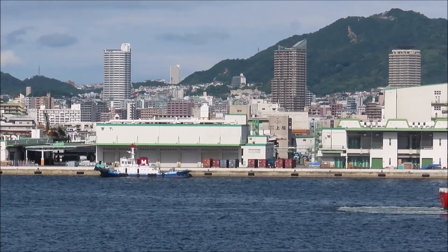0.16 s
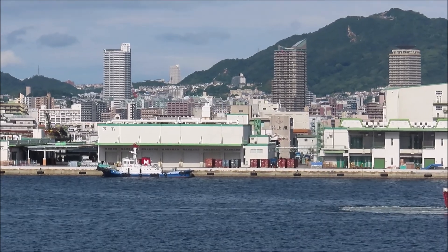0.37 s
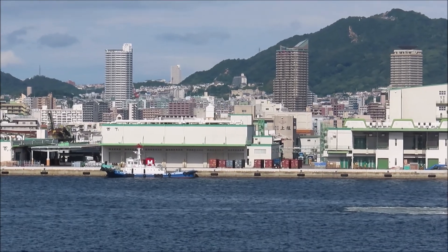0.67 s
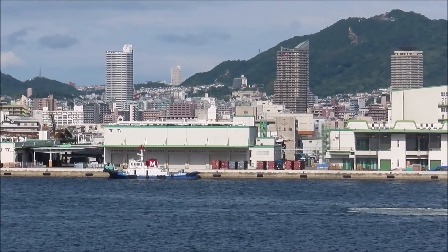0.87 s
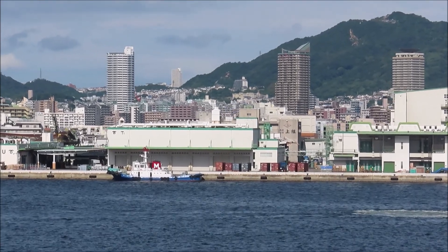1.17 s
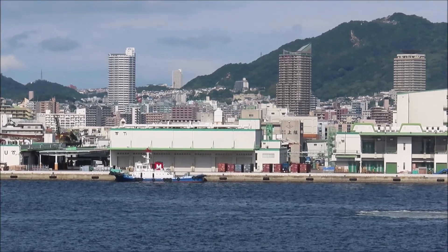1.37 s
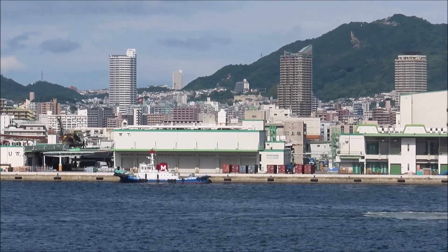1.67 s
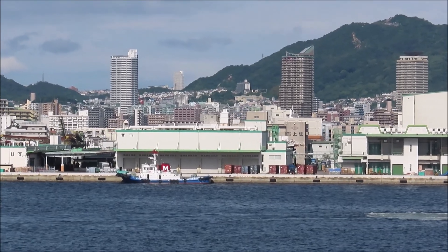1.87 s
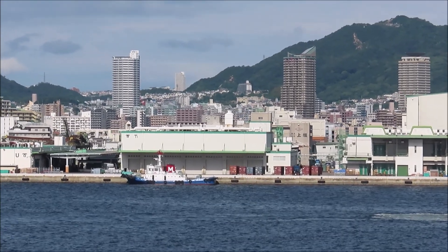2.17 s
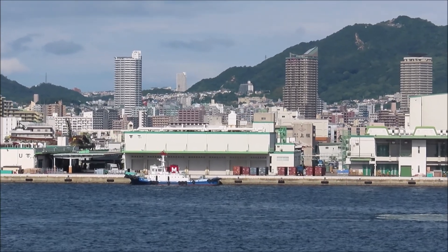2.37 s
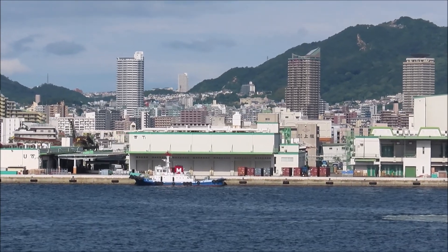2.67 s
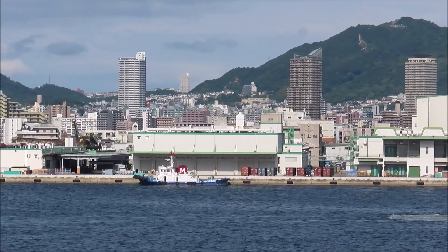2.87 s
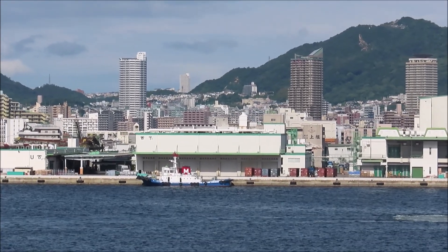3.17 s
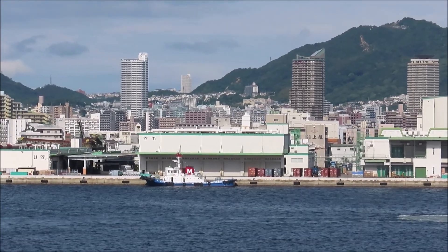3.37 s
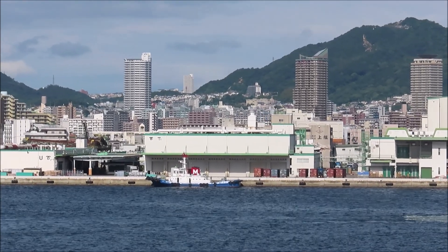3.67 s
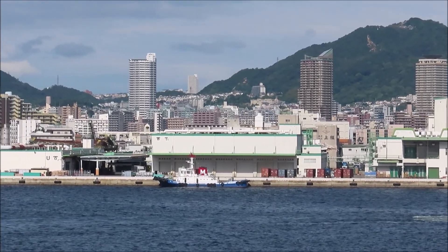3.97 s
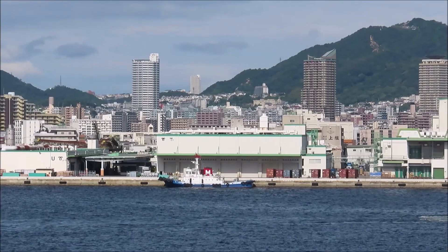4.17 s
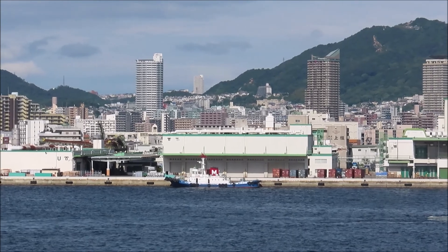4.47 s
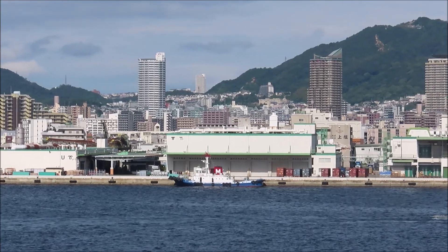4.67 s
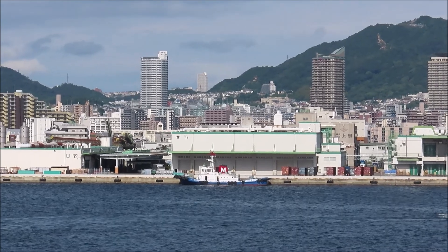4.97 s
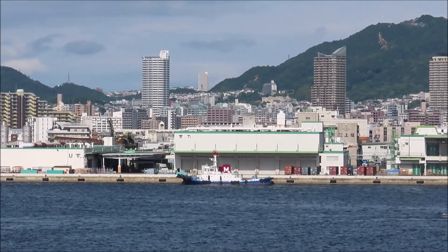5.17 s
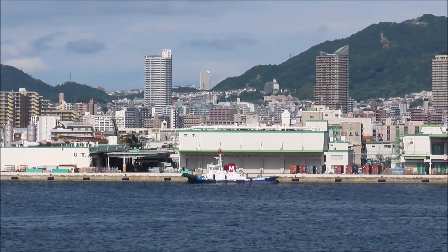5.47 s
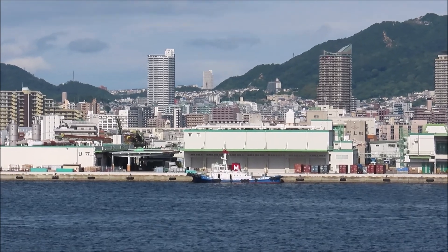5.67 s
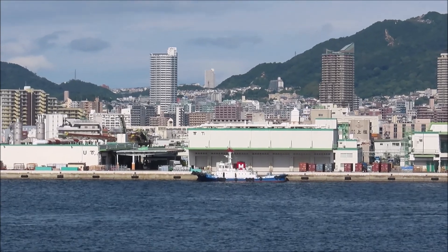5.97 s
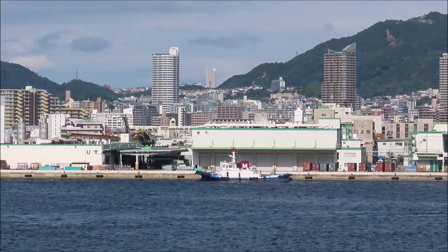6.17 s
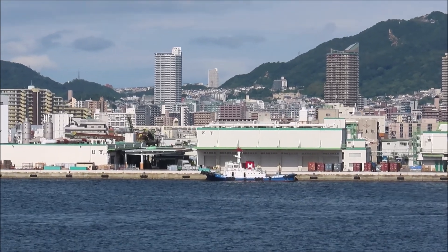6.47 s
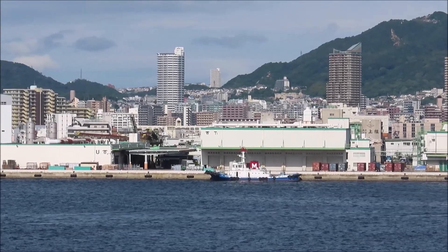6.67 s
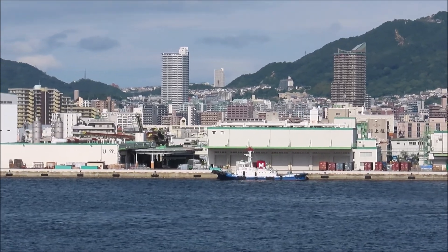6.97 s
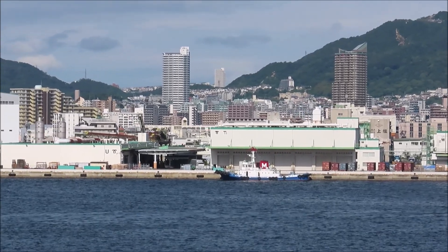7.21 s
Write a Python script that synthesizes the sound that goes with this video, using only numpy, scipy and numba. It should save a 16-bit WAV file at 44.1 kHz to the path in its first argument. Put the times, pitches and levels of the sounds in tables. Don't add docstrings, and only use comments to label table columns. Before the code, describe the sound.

Continuous deep engine drone and hull vibration, lumpy and restless, heard close from a boat deck outdoors. Soft wash and light spray hiss sit well beneath it, the spray spread wide. The bass grows fuller after about two seconds; blunt wind bumps strike the stereo microphone from 4.5 to 5.5 seconds, after which the low end is reduced.

```python
import sys
import numpy as np
from scipy import signal
from scipy.io import wavfile
from scipy.ndimage import uniform_filter1d
from numba import njit

SR = 44100
rng = np.random.default_rng(int(sys.argv[2]) if len(sys.argv) > 2 else 0)


def persist_wave(psi):
    counts = np.round(np.clip(psi, -1, 1) * 32767).astype(np.int16)
    wavfile.write(sys.argv[1], SR, np.atleast_2d(counts).T)


def natural_amplitude(level_db):
    exponent = np.asarray(level_db, float) / 20
    return 10 ** exponent


N = 323694

PORT_FIRING_HZ, STARBOARD_FIRING_HZ = 43.93, 45.045
CANCEL_S = .79
# multiple of firing rate, port level/dB rms, starboard level/dB rms, unsteadiness/dB,
# starboard lead at CANCEL_S/rad
ENGINE_ORDERS = [
    (1, -20, -20, .4, 3.1),
    (2, -26, -26.5, 1.5, -2.6),
    (3, -34, -35, 2.5, 3.1),
    (6, -39, -47, 4, -2.4),
    (12, -53, -53, 4, 0),
]
# f/Hz, level/dB rms, unsteadiness/dB
AUXILIARIES = [(26.5, -34.5, 1.5), (60.4, -31, 2.5), (78.4, -23.5, -0.5), (90.7, -29, 2.5), (121.3, -31, 4),
               (161.6, -31.5, 4)]
# f/Hz, width/Hz, level/dB rms
HULL_MODES = [(36.2, 36, -29.5), (79.4, 16, -28), (88.3, 20, -26.5), (121.8, 20.6, -19.5),
              (135.1, 16.4, -25.5), (163.6, 10, -33.5), (220.7, 39.5, -33), (261.5, 22.4, -32),
              (359.2, 40, -36.5), (525, 36, -40.5)]
SWELL_BELOW_HZ = 190
# t/s, rise/dB, length/s
SURGES = [(0.122, 11, 0.049), (0.399, 6.5, 0.37), (0.94, 9, 0.19), (1.185, 1.5, 0.077), (1.435, 7.5, 0.16),
          (1.963, 12.5, 0.11), (2.393, 4, 0.26), (2.796, 12.5, 0.31), (3.28, 2.5, 0.042),
          (3.599, 14, 0.084), (3.79, 3, 0.042), (4.017, 6, 0.11), (4.278, 12, 0.18), (4.512, 10, 0.055),
          (4.896, 16, 0.13), (5.83, 9, .05), (6.198, 6, 0.12), (6.784, 5, 0.12), (7.313, 8.5, 0.063)]
# t/s, fall/dB
LULLS = [
    (.01, 7.5),
    (2.12, 1),
    (5.09, 15),
    (5.45, -2),
    (5.72, 0),
    (6.56, 4),
    (7.1, -3),
]
LULL_S, CALM_DB = 0.21, -5.5
PANEL_EDGES_HZ = [72, 104, 150, 235, 330, 480, 700, 1100]
FLEX_S, STIFFNESS = .045, .9
# t/s, rise/dB
KEEL_FLEX = [(0.05, 0), (0.21, -8), (0.36, -7.5), (0.59, 3.5), (0.66, -5.5), (0.77, -5), (0.85, 4),
             (1.12, -10), (1.26, -7), (1.35, 4.5), (1.44, 0.5), (1.6, -3.5), (1.69, -18), (1.8, 3),
             (1.96, 2.5), (2.08, -8), (2.2, -6), (2.27, 3.5), (2.37, 6), (2.47, -4.5), (2.57, -1.5),
             (2.63, 0.5), (2.69, -7), (2.75, 1.5), (2.89, -6.5), (3.21, -1), (3.32, 5), (3.4, -6),
             (3.59, 1.5), (3.68, 0), (3.74, -7), (3.87, -1), (3.94, -5.5), (4.07, 3), (4.17, -7.5),
             (4.25, 1.5), (4.32, -12), (4.48, 6.5), (4.68, -4), (4.98, 2.5), (5.13, -12), (5.28, -10),
             (5.41, -1), (5.53, -2), (5.59, -1), (5.69, -6.5), (5.88, 1), (5.95, -6.5), (6.01, 4),
             (6.15, -6), (6.22, -8), (6.32, 5.5), (6.51, -1), (6.65, -1), (6.8, 3), (6.95, -2), (7.04, -11),
             (7.29, 3.5)]
# t/s, rise/dB
SIDE_FLEX = [(0.02, -7.5), (0.2, -1), (0.27, -0.5), (0.35, 8.5), (0.63, -2.5), (0.72, -4.5), (0.82, -9),
             (0.91, 0), (1.12, -4.5), (1.2, -1.5), (1.44, 6), (1.52, -6.5), (1.72, 0.5), (1.84, -10.5),
             (1.9, 4.0), (1.98, -1), (2.2, -1), (2.39, -4.5), (2.51, 4), (2.57, -7), (2.63, 5.5), (2.7, -5),
             (2.78, 4), (2.86, -3.0), (3.2, -5.5), (3.33, -3), (3.45, 2.0), (3.82, 3), (3.88, -4),
             (3.94, -4.5), (4.14, -5.5), (4.24, 4.0), (4.35, 2.0), (4.44, -3.5), (4.52, 0.5), (4.58, 0),
             (4.67, -3), (4.84, 0), (5.05, -8.0), (5.11, -3.5), (5.2, -4.5), (5.26, 7.5), (5.62, -12),
             (5.77, 4.5), (5.83, -8), (5.9, -6), (6.0, -2), (6.13, 5.0), (6.22, 5), (6.36, -4), (6.42, -1),
             (6.57, -7), (6.68, -1), (6.75, 5), (6.88, 4), (7.02, -5), (7.2, -6.5), (7.32, -3)]
# t/s, rise/dB
DECK_FLEX = [(0.0, 2), (0.07, -1), (0.16, 0), (0.34, 4.5), (0.45, 3.5), (0.53, -2), (0.61, -5.5), (0.8, 1),
             (0.87, -3), (0.97, -7), (1.2, -3.5), (1.29, 2), (1.53, 2), (1.59, -3.5), (1.68, -2), (1.79, 3),
             (1.85, -4), (1.97, 1), (2.27, 1), (2.46, 4.5), (2.57, -6), (2.63, 6.5), (2.7, -5.5),
             (3.11, -2.5), (3.25, -7), (3.5, 0), (3.58, 0.5), (3.66, 1), (3.91, -2), (3.98, 6),
             (4.12, -1.5), (4.21, -7.5), (4.33, -3.5), (4.43, -5), (4.49, 5.5), (4.61, -10), (4.75, 3.0),
             (4.86, -0.5), (5.11, -1), (5.19, -5), (5.25, 1), (5.32, 2), (5.41, 0), (5.48, -7),
             (5.74, -8.0), (5.91, 0.5), (5.99, 4.5), (6.06, -6), (6.17, -4), (6.25, -3.5), (6.49, -5),
             (6.57, 1), (6.67, -2.0), (6.73, -12), (6.91, 2), (7.08, -2), (7.2, -3), (7.3, 2)]
# t/s, rise/dB
RAIL_FLEX = [(0.03, -2.5), (0.13, -2.0), (0.19, 5), (0.47, -4), (0.54, 7), (0.61, -2.5), (0.73, -0.5),
             (0.79, 0), (0.92, 2), (1.06, -2), (1.22, -5.0), (1.44, 4.5), (1.51, -4.0), (1.6, 3),
             (1.79, -2), (1.87, 2.0), (1.99, -1), (2.05, 0.5), (2.15, -2), (2.42, 3.5), (2.5, -2.5),
             (2.68, -3.5), (2.74, 2.5), (3.18, 0), (3.4, 2), (3.55, -1.5), (3.73, -0.5), (3.86, -2.5),
             (3.94, 0.5), (4.05, 3), (4.16, 4.5), (4.22, -3.5), (4.49, -6), (4.7, -5), (4.84, -5),
             (4.91, -3.5), (4.98, 2), (5.05, -2), (5.18, 4), (5.24, -19), (5.3, 2), (5.39, -3), (5.46, 1),
             (5.52, 1), (5.75, -2), (5.92, 1.5), (6.11, -9.5), (6.21, -4.5), (6.37, 6.5), (6.52, -4),
             (6.72, -3), (6.84, -3.5), (6.9, 0), (6.99, 1), (7.05, -5)]
# t/s, rise/dB
CABIN_FLEX = [(0.0, -2), (0.08, -1.5), (0.24, 1.5), (0.39, 2), (0.5, -5.5), (0.57, 4), (0.64, -1),
              (0.77, 3), (1.18, -5), (1.38, 1), (1.44, -5), (1.5, -3), (1.66, 2), (2.09, 3), (2.34, 2),
              (2.45, -4.5), (2.62, 1.5), (2.78, 2), (3.06, -3.5), (3.43, -2.0), (3.63, 1), (3.72, -2.5),
              (3.82, -7.5), (3.88, 3.5), (4.28, 0), (4.34, 0), (4.68, -1), (4.9, 0), (5.02, -1), (5.11, 0),
              (5.25, 5), (5.33, -1.5), (5.43, -0.5), (5.71, -1), (5.82, -6), (5.89, 3.0), (5.95, -5),
              (6.1, -4), (6.2, 1.5), (6.42, 2.0), (6.49, -5.5), (6.66, -4), (6.73, 2.5), (7.21, -2),
              (7.27, 0.5)]
# t/s, rise/dB
HATCH_FLEX = [(0.08, -2.5), (0.32, -2.5), (0.41, 1.5), (0.55, 2), (0.78, -3.0), (1.04, 0.5), (1.1, -1.5),
              (1.22, 3), (1.43, -2), (1.58, 2.5), (1.83, -2.5), (2.14, 4), (2.32, -3), (2.5, 1), (2.6, 1.5),
              (2.67, -4), (3.0, -1.5), (3.18, -4), (3.27, 2.5), (3.34, 0.5), (3.4, -3), (3.53, 2),
              (3.61, 2.5), (3.98, -3.5), (4.1, -2.5), (4.32, 1), (4.56, 2.5), (4.71, -2), (4.85, -5),
              (4.99, -5), (5.06, -2.5), (5.23, 0.5), (5.65, 1.0), (5.79, -3.5), (5.86, 3.5), (6.17, -2),
              (6.25, 0), (6.39, -5), (6.69, 2.0), (6.82, -2)]
# t/s, rise/dB
FRAME_FLEX = [(0.0, 1.5), (0.14, -2.5), (0.23, -2.0), (0.49, 3.0), (0.57, -1.0), (0.78, -0.5), (1.12, 3.5),
              (1.19, -4), (1.65, -5), (1.8, 2.5), (1.98, -0.5), (2.33, -1), (2.77, -2.5), (2.83, 2),
              (2.91, 1.5), (3.32, -2), (3.54, 2), (3.83, 3.5), (3.9, -1.5), (4.11, -2), (4.29, 0.5),
              (4.58, -3.5), (4.68, -2.5), (4.75, 1), (5.02, -2), (5.08, -1.0), (5.46, 3), (5.68, -1),
              (5.83, -3), (5.99, 2.0), (6.18, -3.5), (6.41, -4), (6.47, 1.5), (6.53, -2.5), (6.59, 1),
              (6.69, -2.5), (6.81, -1.5), (7.01, 0.5), (7.09, -3.0), (7.25, 2.5)]
PANELS = [KEEL_FLEX, SIDE_FLEX, DECK_FLEX, RAIL_FLEX, CABIN_FLEX, HATCH_FLEX, FRAME_FLEX]
# f/Hz, level/dB per Hz
WASH_SPECTRUM = [(130, -28), (180, -9), (205, -1.5), (300, -9), (380, -11.5), (450, -14.5), (850, -16.5),
                 (1500, -22.5), (2600, -33.5), (3500, -35.5), (4300, -46), (5000, -52.5), (5600, -48.5),
                 (6100, -54), (8500, -54), (9800, -63.5)]
# f/Hz, level/dB per Hz
SPRAY_SPECTRUM = [(130, -10.5), (250, -2.5), (520, 0.5), (650, -8.5), (1450, -2.5), (2000, -8),
                  (3400, -13.5), (5800, -23), (7400, -22.5), (9500, -23), (12000, -26), (14000, -23.5),
                  (15300, -32), (17000, -33.5)]
WASH_DB, SPRAY_DB = -28.5, -44
SPRAY_FROM_HZ = 1650
# t/s, rise ahead/dB, rise aside/dB
SPLASHES = [(.25, 1, 3.5), (1.2, 2.5, 4.5), (1.6, 0, 2.5), (2.001, 2, 4), (2.399, 4, 4), (3.051, 0, -2),
            (3.8, 4, 4), (4.05, 3, 1.5), (4.5, -0.5, -0.5), (5.0, 0.5, 1.5), (5.401, 4.5, 4), (6.1, 0, 3.5),
            (6.601, -3, 3.5), (7.2, 1.5, 5.5)]
SPLASH_S, SPRAY_AHEAD_DB, SPRAY_ASIDE_DB = 0.31, -3, 1.1
MORE_ASIDE_FROM_S, MORE_ASIDE_DB = 4.8, 2.5
# t/s, rise/dB, length/s
MIST = [
    (1.348, 2.5, .2),
    (2.8, -2.5, .25),
    (3.45, 2, .12),
    (3.8, 3, .2),
    (4.7, -0.5, .15),
]
SHARED_SPRAY_DB, SHARED_FADES_FROM_S, SHARED_FADE_DB_PER_S = -12.2, 5.0, 1.2
# t/s, rise/dB, length/s
SHARED_SWELLS = [
    (0, .5, .5),
    (.6, 1, .35),
    (1.35, 1.5, .25),
    (2.2, -1, .12),
    (2.55, 1, .08),
    (3.2, 2, .3),
    (4.75, 1.5, .25),
    (6.4, -.7, .2),
    (7.2, -2.5, .15),
]
# t/s, level/dB rms
WIND = [
    (0, -60),
    (1.8, -60.5),
    (2.1, -45.5),
    (2.75, -40.5),
    (3.6, -47),
    (4.7, -27.5),
    (4.9, -28),
    (5.25, -23),
    (5.6, -29.5),
    (7.34, -55),
]
# t/s, peak level/dB, f/Hz, length/s, share differing between ports
PUFFS = [(4.458, -22, 90, 0.014, 1.6), (4.508, -26, 216, 0.03, 0.9), (4.567, -20, 153, 0.0097, 1.4),
         (4.722, -16, 160, 0.0027, 2.5), (4.744, -19.5, 126, 0.017, 1.3), (4.767, -29, 300, 0.0082, 1.7),
         (4.788, -16, 202, 0.0017, 2.5), (4.977, -8.5, 243, 0.005, .05), (5.2414, -4.5, 250, 0.0026, 3),
         (5.2549, -5, 205, 0.006, 2.0), (5.268, -9, 300, .0018, 1.3), (5.476, -9.5, 160, 0.0064, 3.3),
         (5.504, -9.5, 161, 0.006, 3), (5.519, -15, 251, .003, 4.6), (7.262, -12.5, 170, 0.0031, 0.044),
         (7.299, -10, 192, 0.003, 0.044), (7.3294, -2, 99, 0.012, .05), (7.3395, -9, 99, 0.0044, .05)]
# t/s, corner/dB re 40 Hz
LOW_CUT = [(0, 17.5), (.25, 17), (.4, 15), (.9, 14), (1.6, 9.5), (1.77, 10.5), (1.82, -5.5), (3.0, -4),
           (4.785, -21.5), (4.797, 25), (7.34, 27.5)]
FULL_GAIN_DB, KNEE_DB, SQUEEZE, LISTEN_S = 2.5, -17.5, 0.71, 0.49


def rms_one(x):
    return x / np.sqrt(np.mean(x ** 2) + 1e-20)


def in_time(rows):
    s, *columns = np.transpose(rows)
    return [np.interp(np.arange(N) / SR, s, c) for c in columns]


def drift(rate_hz):
    r = np.exp(-80 * np.pi * rate_hz / SR)
    noise = rng.standard_normal(N // 40 + 2002)
    slow = signal.lfilter([1], [1, -2 * r, r * r], noise)[2000:]
    return np.interp(np.arange(N) / 40, np.arange(len(slow)), rms_one(slow))


def bumps(s, db, length_s):
    t = np.arange(0, N + 64, 64) / SR
    total_db = np.sum(db * np.exp(-((t[:, None] - s) / length_s) ** 2), axis=1)
    return np.interp(np.arange(N) / SR, t, total_db)


def filtered(kind, order, hz, x):
    return signal.sosfilt(signal.butter(order, hz, kind, fs=SR, output="sos"), x)


def filtered_in_phase(kind, order, hz, x):
    return signal.sosfiltfilt(signal.butter(order, hz, kind, fs=SR, output="sos"), x)


def tone(hz, db, wobble_db, phase_rad):
    wander_rad = .12 * wobble_db * drift(1.5)
    turn_rad = 2 * np.pi * hz * (np.arange(N) / SR - CANCEL_S) + phase_rad + wander_rad
    return np.sqrt(2) * natural_amplitude(db + wobble_db * drift(1.54)) * np.sin(turn_rad)


def engines():
    out = 0
    for order, port_db, starboard_db, wobble_db, lead_rad in ENGINE_ORDERS:
        start_rad = rng.uniform(0, 2 * np.pi)
        out = out + tone(round(order) * PORT_FIRING_HZ, port_db, wobble_db, start_rad)
        out = out + tone(round(order) * STARBOARD_FIRING_HZ, starboard_db, wobble_db, start_rad + lead_rad)
    return out


def swell_db():
    s, fall_db = np.transpose(LULLS)
    return CALM_DB + bumps(*np.transpose(SURGES)) - bumps(s, fall_db, LULL_S)


def hull():
    panels, fittings = 0, 0
    for hz, width_hz, db in HULL_MODES:
        r = np.exp(-1.5 * np.pi * width_hz / SR)
        mode = [1, 0, -1, 1, -2 * r * np.cos(2 * np.pi * hz / SR), r * r]
        ringing = signal.sosfilt([mode, mode], rng.standard_normal(N + 8000))[8000:]
        ringing = natural_amplitude(db) * rms_one(ringing)
        if hz < SWELL_BELOW_HZ:
            panels = panels + ringing
        else:
            fittings = fittings + ringing
    short_term = np.sqrt(uniform_filter1d(panels ** 2, size=5000)) / np.std(panels)
    evened = panels / short_term ** .6
    return evened * natural_amplitude(swell_db()) + fittings


def flexing(rumble):
    out = rumble.copy()
    for table, low_hz, high_hz in zip(PANELS, PANEL_EDGES_HZ, PANEL_EDGES_HZ[1:]):
        band = filtered_in_phase("band", 3, [low_hz, high_hz], rumble)
        power = band ** 2
        chance = uniform_filter1d(power, size=3000) / uniform_filter1d(power, size=30000)
        gain = natural_amplitude(bumps(*np.transpose(table), FLEX_S)) / chance ** (STIFFNESS / 2)
        out += band * (gain - 1)
    return out


def auxiliaries():
    return sum(tone(hz, db, wobble_db, rng.uniform(0, 2 * np.pi)) for hz, db, wobble_db in AUXILIARIES)


def water_noise(spectrum, splash_db, patchy_db, rate_hz):
    out, together = 0, drift(26.0)
    edges_hz = 140 * 2 ** np.arange(0, 7.1, 1 / 3)
    white, points = rng.standard_normal((2, N)), np.array(spectrum)
    for k, (low_hz, high_hz) in enumerate(zip(edges_hz, edges_hz[1:])):
        band = filtered("band", 2, [low_hz, high_hz], white[k % 2])
        level_db = np.interp(np.log(low_hz * high_hz) / 2, np.log(points[:, 0]), points[:, 1])
        sprayed = 1 / (1 + (SPRAY_FROM_HZ / low_hz) ** 2)
        gusts_db = sprayed * (0.68 * splash_db + 0.67 * together)
        out = out + natural_amplitude(level_db + gusts_db + patchy_db * drift(rate_hz)) * band
    return out / np.std(filtered("high", 4, 280, out))


def bow_wash():
    s, ahead_db, _ = np.transpose(SPLASHES)
    splash_db = SPRAY_AHEAD_DB + bumps(s, ahead_db, SPLASH_S)
    wash = natural_amplitude(WASH_DB) * water_noise(WASH_SPECTRUM, splash_db, patchy_db=1.24, rate_hz=25.0)
    wash = signal.sosfilt(signal.cheby2(8, 40, 10000, fs=SR, output="sos"), wash)
    five_khz_band = filtered_in_phase("band", 2, [4700, 5650], wash)
    wash = wash + .3 * five_khz_band
    mist = filtered_in_phase("high", 2, 6500, wash)
    return wash + mist * (natural_amplitude(bumps(*np.transpose(MIST))) - 1)


def side_spray():
    s, _, aside_db = np.transpose(SPLASHES)
    more_aside_db = MORE_ASIDE_DB * (np.arange(N) > MORE_ASIDE_FROM_S * SR)
    splash_db = SPRAY_ASIDE_DB + bumps(s, aside_db, SPLASH_S) + more_aside_db
    return natural_amplitude(SPRAY_DB) * water_noise(SPRAY_SPECTRUM, splash_db, patchy_db=-1.0, rate_hz=5.)


def shared_spray(apart):
    fade_db = SHARED_FADE_DB_PER_S * np.maximum(np.arange(N) / SR - SHARED_FADES_FROM_S, 0)
    level_db = SHARED_SPRAY_DB - fade_db + bumps(*np.transpose(SHARED_SWELLS)) + 1.0 * drift(14)
    spray = filtered("band", 4, [8800, 12700], apart)
    return natural_amplitude(level_db) * np.roll(spray, round(0.016 * SR))


def puffs():
    out, t = np.zeros((2, N)), np.arange(N) / SR
    for s, db, hz, length_s, uneven in PUFFS:
        dent = natural_amplitude(db) * np.exp(-((t - s) / length_s) ** 2) * np.sin(2 * np.pi * hz * (s - t))
        out += dent * [[1 + uneven], [1 - uneven]]
    return out


def wind():
    out = []
    for _ in range(2):
        noise = filtered("band", 2, [30, 190], rng.standard_normal(N))
        out.append(rms_one(noise * natural_amplitude(5.0 * drift(33.0))))
    return np.array(out) * natural_amplitude(in_time(WIND)[0] + 0.5)


def scene():
    machines, wash = auxiliaries(), bow_wash()
    shared = flexing(engines() + machines + hull() + wash)
    apart = side_spray() + natural_amplitude(-29.5) * wash + natural_amplitude(-33.0) * machines
    shared = shared + shared_spray(apart)
    return shared + apart * [[1], [-1]] + wind() + puffs()


@njit
def sliding_cut(x, pole):
    out, low = np.empty_like(x), 0.
    for i in range(len(x)):
        low = x[i] + pole[i] * (low - x[i])
        out[i] = x[i] - low
    return out


def low_cut(x, corners_hz):
    for hz in corners_hz:
        x = sliding_cut(x, np.exp(-2 * np.pi * hz / SR))
    return x


def ridden_gain(x):
    r = np.exp(-1 / (LISTEN_S * SR))
    knee_power = natural_amplitude(2 * KNEE_DB)
    power = signal.lfilter([1 - r], [1, -r], x ** 2, zi=[knee_power])[0]
    over_db = 10 * np.log10(1 + power / knee_power)
    return natural_amplitude(FULL_GAIN_DB - SQUEEZE * over_db)


def preamplifier_noise():
    return natural_amplitude(-55) * rms_one(filtered("band", 2, [12, 45], rng.standard_normal(N)))


def roll_off(x):
    return signal.sosfilt(signal.butter(12, 15200, fs=SR, output="sos"), x)


def record(dry):
    corner_hz = 40 * natural_amplitude(in_time(LOW_CUT)[0])
    mid = low_cut(dry.mean(axis=0), [0.66 * corner_hz, 0.11 * corner_hz])
    side = low_cut((dry[0] - dry[1]) / 2, [ratio * corner_hz for ratio in (1.6, 1.4, 1.3, 1.5)])
    fade_in = np.minimum(np.arange(N) / (0.00047 * SR), 1)
    gain = ridden_gain(mid) * fade_in
    mid = mid + preamplifier_noise()
    mix = 3 * np.tanh(gain * np.array([mid + side, mid - side]) / 3)
    return roll_off(mix)


dry = scene()
out = record(dry)
persist_wave(out)
```